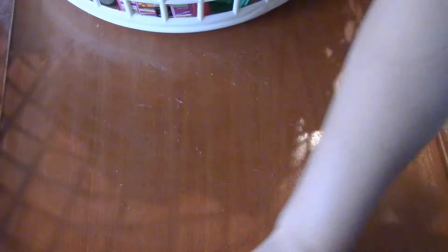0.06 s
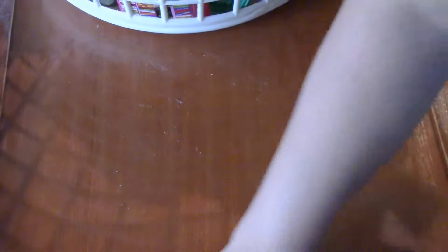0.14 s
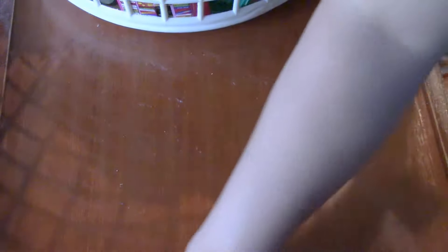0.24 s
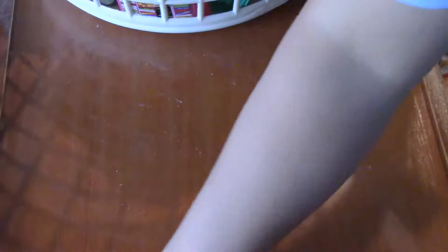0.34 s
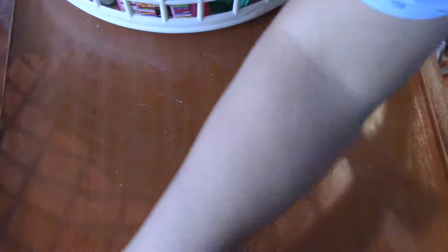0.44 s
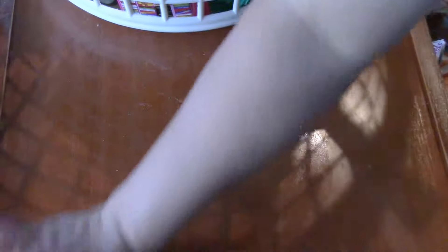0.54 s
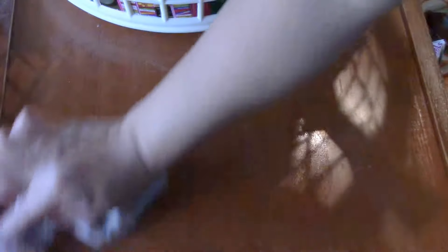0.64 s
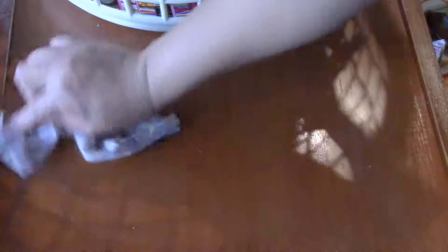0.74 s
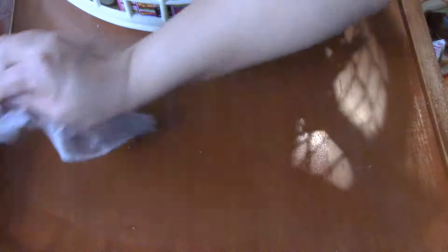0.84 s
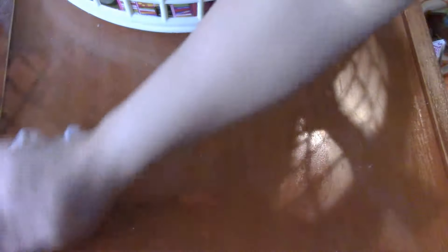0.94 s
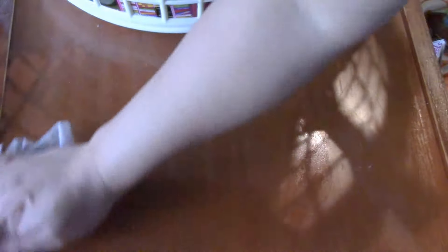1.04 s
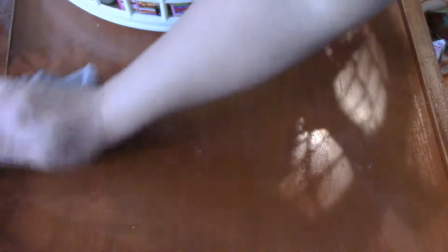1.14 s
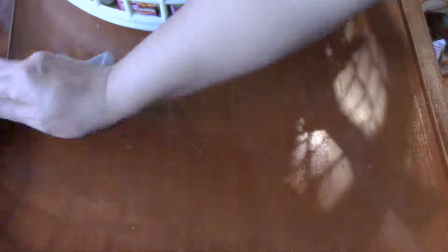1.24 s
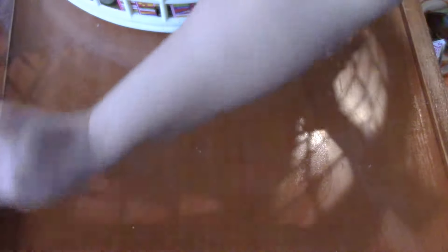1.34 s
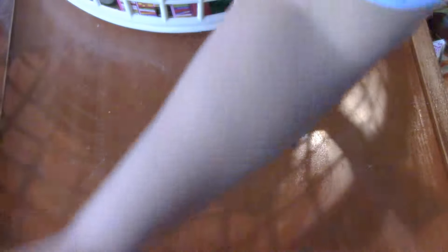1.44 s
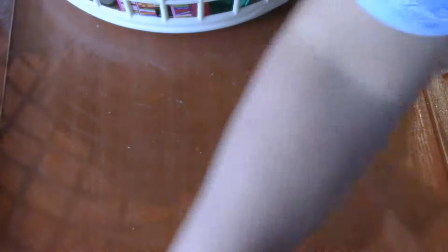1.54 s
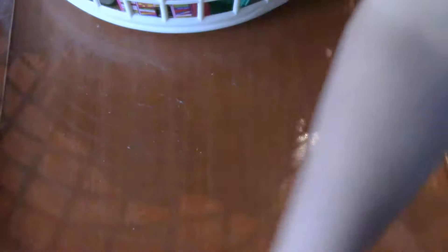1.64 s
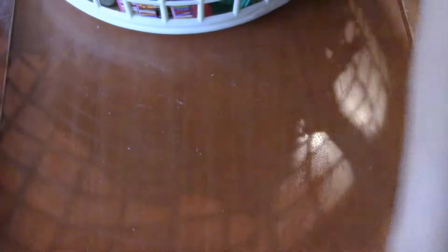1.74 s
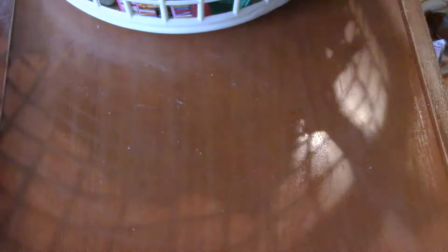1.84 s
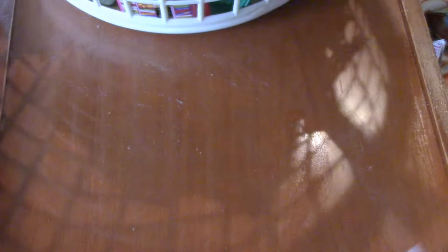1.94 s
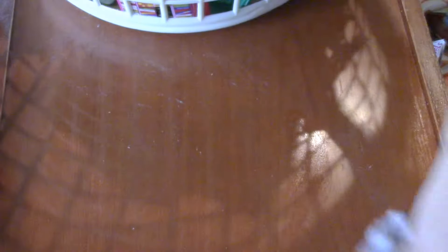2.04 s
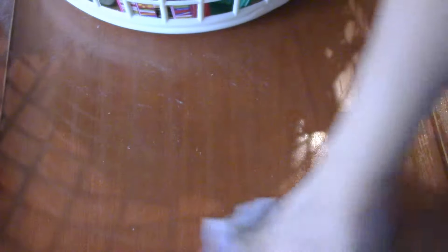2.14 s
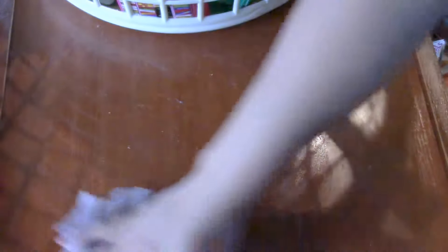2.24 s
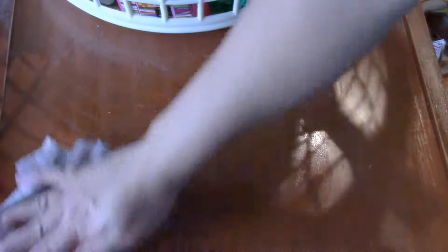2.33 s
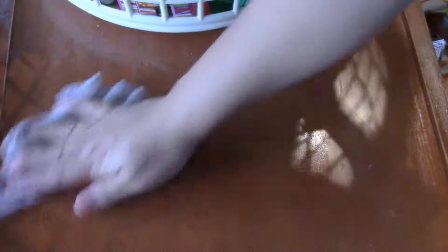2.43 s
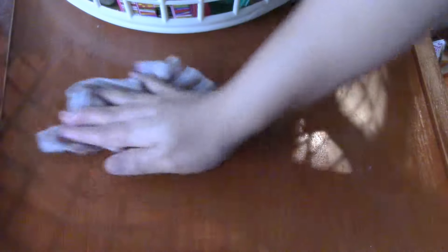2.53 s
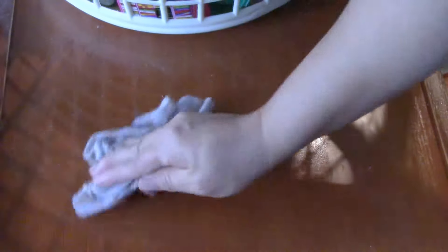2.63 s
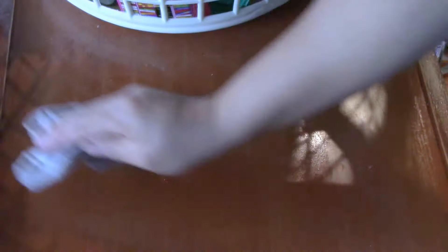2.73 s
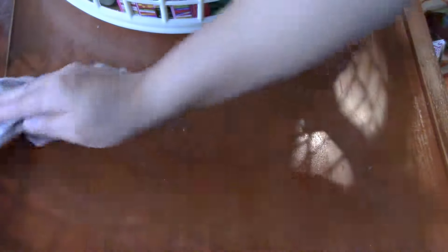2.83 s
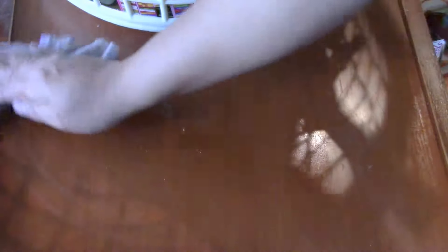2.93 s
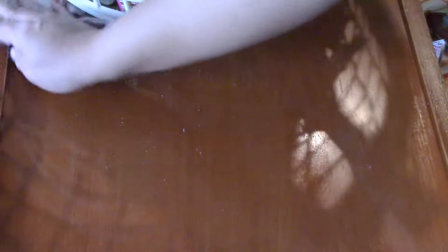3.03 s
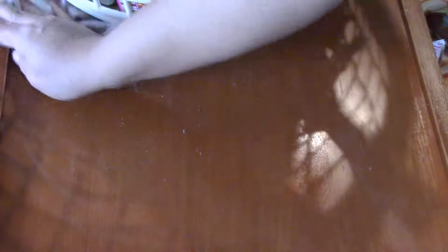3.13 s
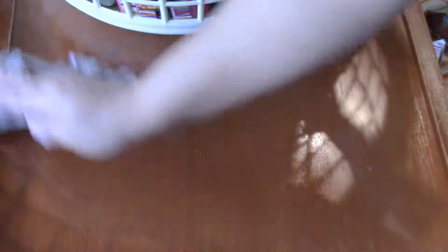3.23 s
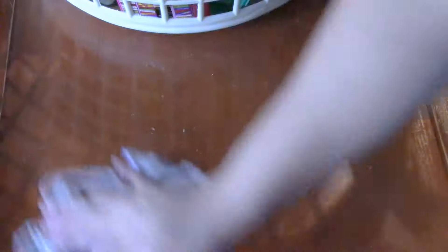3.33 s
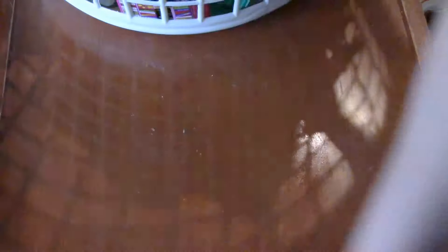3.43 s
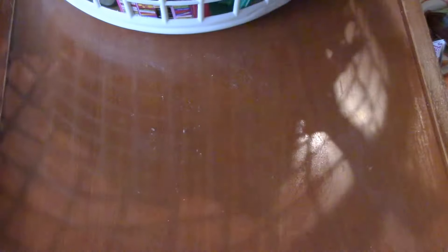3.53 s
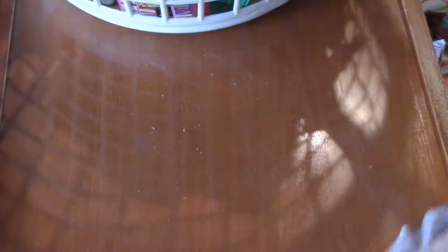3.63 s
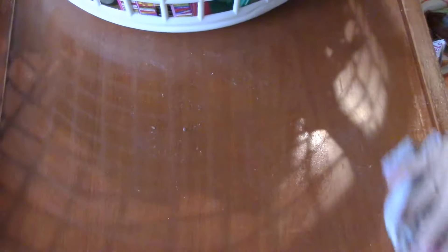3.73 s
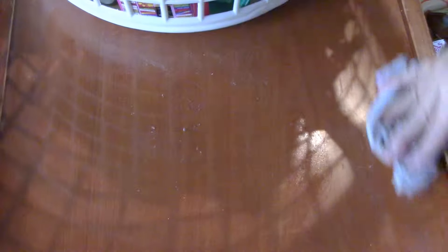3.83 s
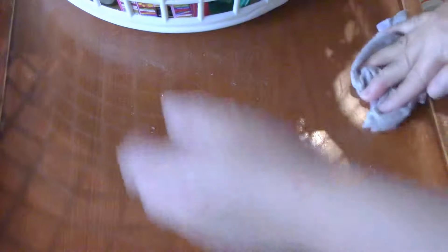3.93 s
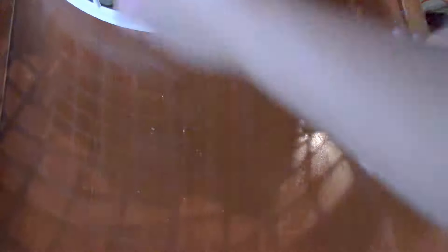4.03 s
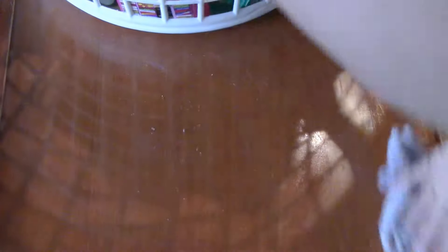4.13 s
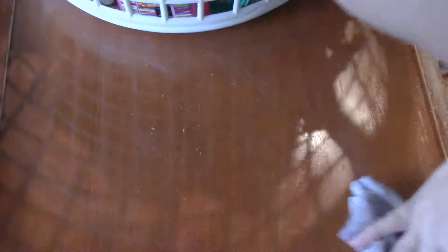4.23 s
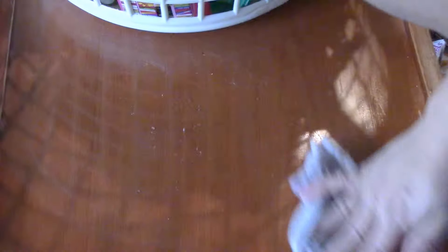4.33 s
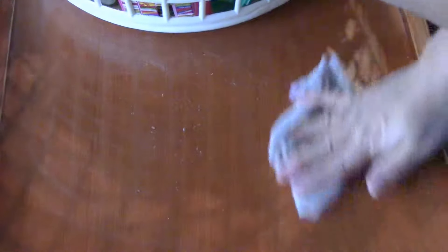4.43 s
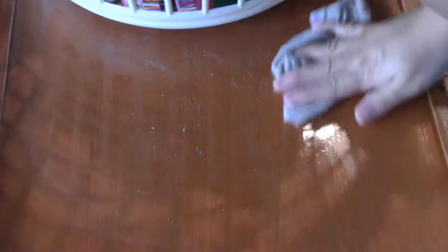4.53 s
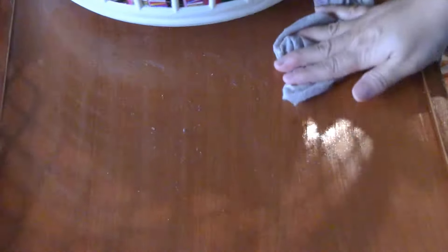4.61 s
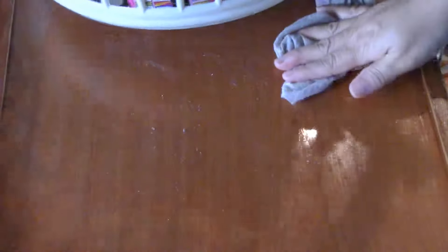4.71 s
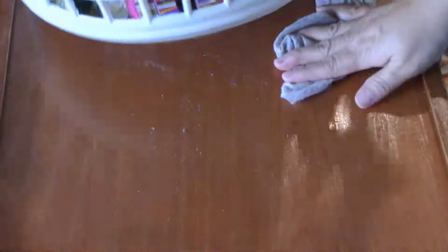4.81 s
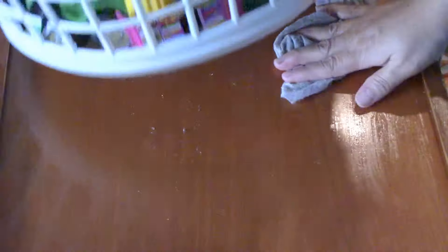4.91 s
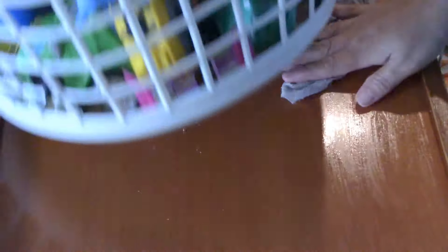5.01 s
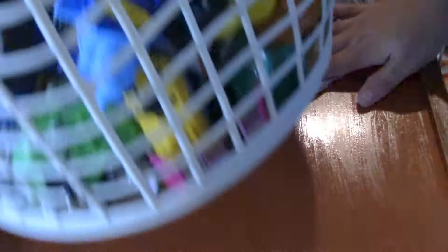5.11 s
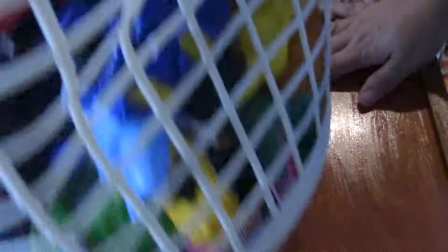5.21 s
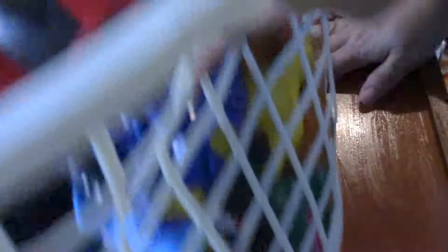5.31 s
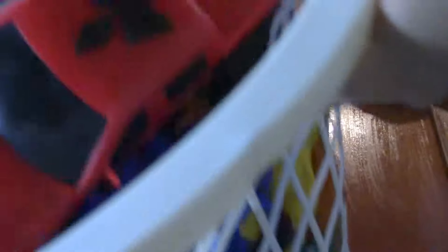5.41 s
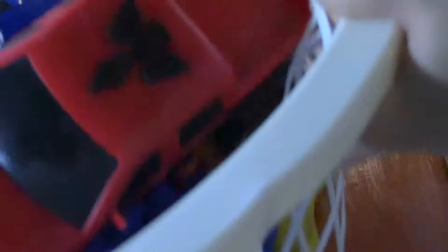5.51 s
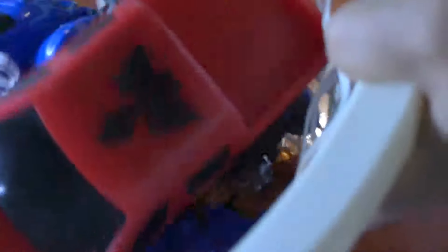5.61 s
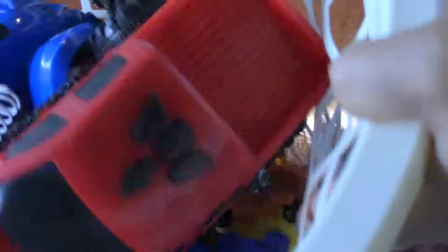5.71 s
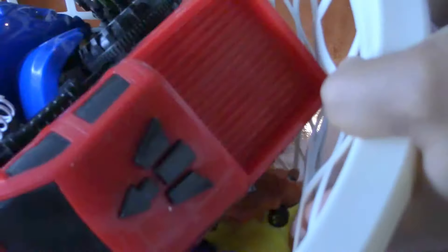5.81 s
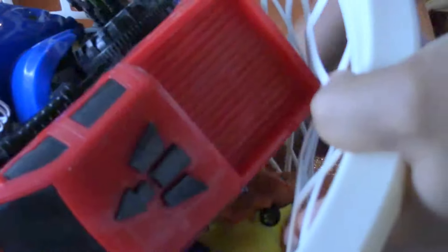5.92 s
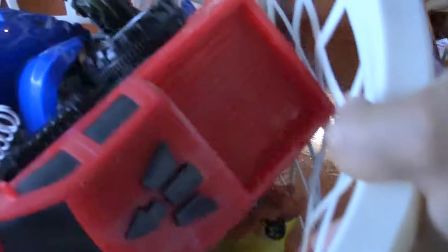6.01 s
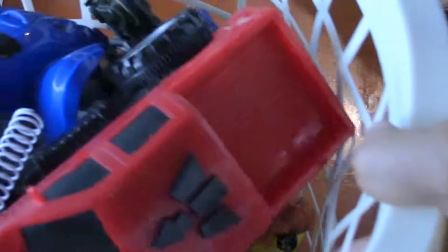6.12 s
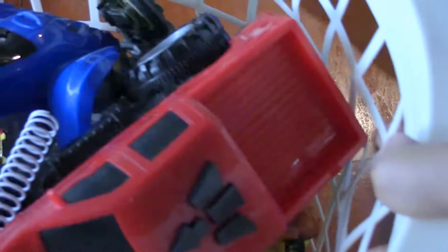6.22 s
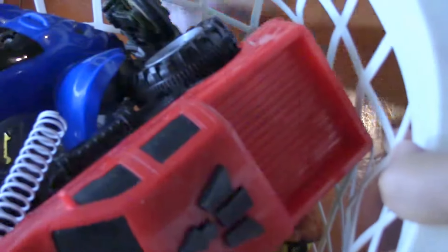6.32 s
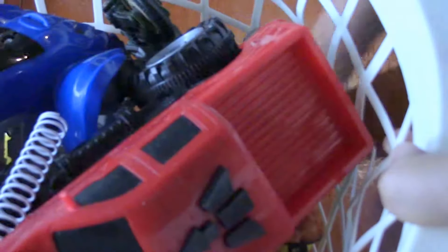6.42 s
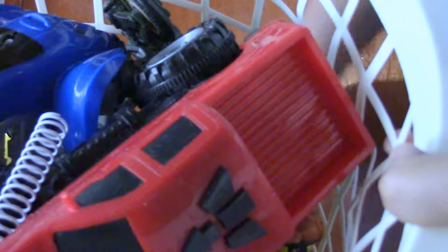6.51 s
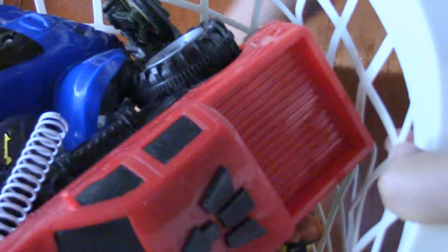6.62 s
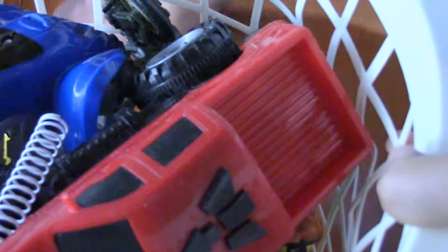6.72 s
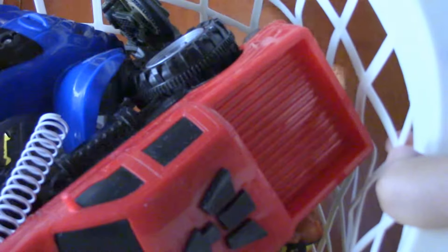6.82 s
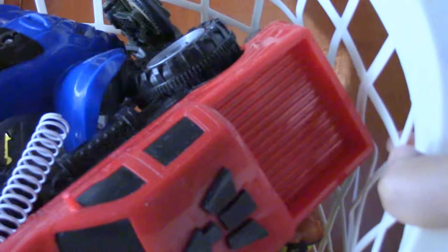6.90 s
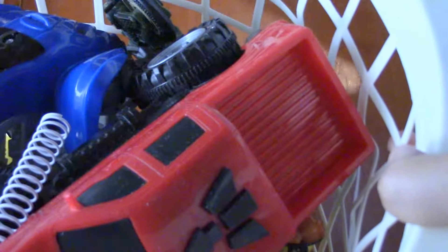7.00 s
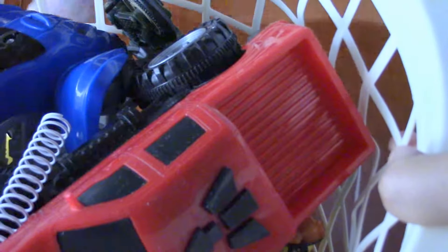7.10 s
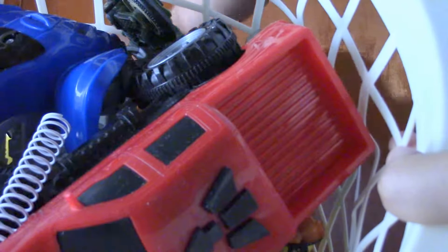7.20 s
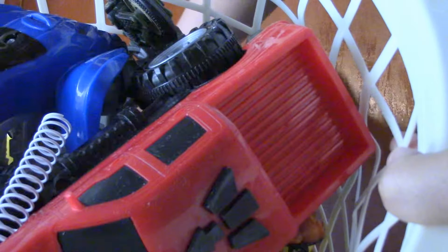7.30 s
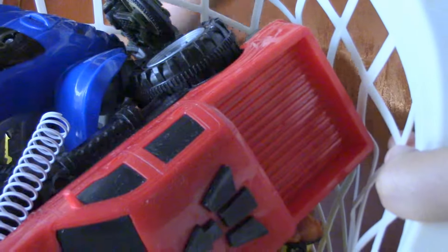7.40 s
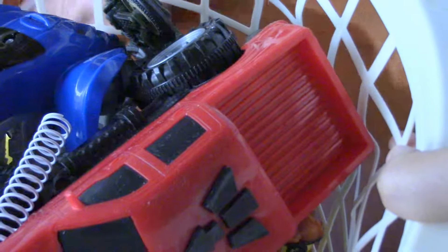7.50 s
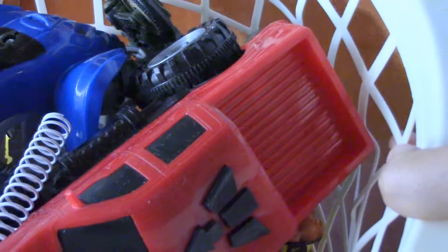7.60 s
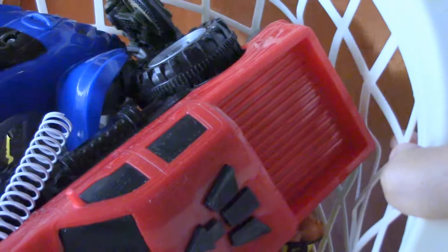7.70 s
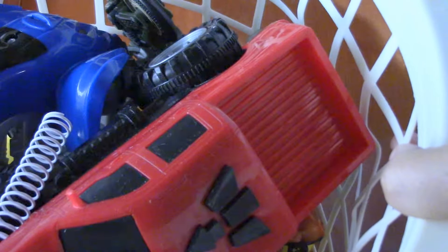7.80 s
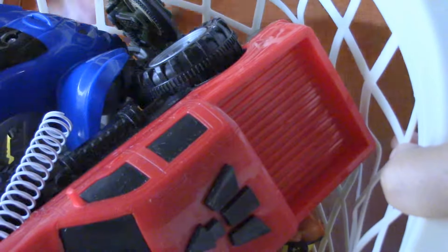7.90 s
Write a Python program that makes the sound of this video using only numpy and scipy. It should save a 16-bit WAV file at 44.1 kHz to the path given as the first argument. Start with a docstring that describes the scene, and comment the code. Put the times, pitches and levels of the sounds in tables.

```python
"""A cloth wipes a varnished wooden table in long strokes: noise from tiny slips, shaped by hand speed and pressure.
A plastic basket of toys on the table ticks as it rocks: short creaks ring the modes of the basket.
The basket is then lifted: hollow toys slide (jerky noise), clatter (bursts of modes) and settle; one snaps
against another (clicks into shell modes) while the wiping goes on.
The place is a small room, heard by a close stereo microphone over a steady floor of filtered noise."""
import sys
import numpy as np
from scipy import signal
from scipy.fft import rfft, irfft, next_fast_len
from scipy.io import wavfile

SR = 44100
rng = np.random.default_rng(int(sys.argv[2]) if len(sys.argv) > 2 else 0)


def unload_wav(signal):
    """Save mono or channel-first audio to the path in sys.argv[1] as 16-bit WAV at rate SR, clipped to [-1, 1]."""
    wavfile.write(
        sys.argv[1],
        SR,
        np.round(np.clip(np.atleast_2d(signal).T, -1, 1) * 32767).astype(np.int16),
    )


N = 350577
TIME = np.arange(N) / SR   # [s]

# Levels in the event tables are relative: each layer adds its own gain.
# strokes of the cloth: (start [s], end [s], hiss at full speed [dB], speeding up [s], slowing down [s])
STROKES = [(-0.05, 0.35, -55.5, 0.044, 0.18), (0.12, 0.49, -58.5, 0.12, 0.043),
           (0.49, 0.85, -53.5, 0.087, 0.11), (0.96, 1.08, -59.5, 0.047, 0.06),
           (1.06, 1.33, -52.5, 0.076, 0.15), (1.51, 2.05, -55.5, 0.19, 0.067),
           (2.02, 2.84, -53, 0.069, 0.42), (2.83, 3.13, -52, 0.24, 0.073), (3.13, 3.7, -57.5, 0.06, 0.086),
           (3.53, 4.03, -52, 0.17, 0.14), (4.01, 4.72, -53.5, 0.37, 0.14), (5.23, 5.55, -58.5, 0.05, 0.12),
           (5.58, 5.88, -60, 0.06, 0.15), (5.82, 6.25, -55.5, 0.1, 0.11), (6.42, 7.0, -55, 0.36, 0.13),
           (7.25, 7.36, -63, 0.03, 0.08), (7.33, 7.78, -57, 0.16, 0.07)]
# the hand bears down on the cloth, then eases off: (time [s], rub level [dB], easing [s])
PRESSES = [(0.0, -49, 0.18), (0.97, -51.5, 0.12), (1.16, -54, 0.11), (1.56, -55, 0.12), (2.06, -52, 0.07),
           (2.42, -54.5, 0.062), (2.87, -55, 0.36), (3.18, -58.5, 0.057), (3.64, -52.5, 0.2),
           (4.2, -52.5, 0.16), (4.5, -52, 0.39), (4.75, -44.5, 0.67), (6.04, -55, 0.089), (6.72, -53, 0.12)]
# colour of the hiss: (frequency [Hz], gain [dB])
HISS_COLOUR = [(1500, -41), (3000, -3.5), (5000, -3.5), (7500, -1), (9500, -3.5), (12000, -9), (14000, -14),
               (16000, -25)]
# colour of the rub: (frequency [Hz], gain [dB])
RUB_COLOUR = [(250, -25), (500, 1), (900, -0.5), (1500, -0.5), (2200, -0.5), (4000, -1.5), (6000, -6),
              (10000, -24)]
# resonances of the rubbed table top: (frequency [Hz], width [Hz], boost [dB])
WOOD_RESONANCES = [(510, 45, 6), (1870, 180, 2), (2340, 210, 4)]


def cloth(hiss_gain_db, rub_gain_db, flutter_db):
    """Thousands of fibres catch on the varnish; under pressure the wood sounds with them."""
    resting_hiss = from_db(-71.5)   # the cloth never quite stops
    resting_rub = from_db(-66.5)   # under the mere weight of the hand
    speed = np.sqrt(motions(STROKES) + resting_hiss ** 2)
    light_rub = from_db(-9) * speed   # a lightly held cloth rubs less than it hisses
    pressure = np.sqrt(pushes(PRESSES, attack_s=0.019) + light_rub ** 2 + resting_rub ** 2)
    hiss = speed * coloured(friction(per_s=25000, spread_db=-1.5), HISS_COLOUR)
    rub = pressure * coloured(friction(per_s=9000, spread_db=1.0), RUB_COLOUR)
    hiss = folding(from_db(hiss_gain_db) * hiss)
    rub = resonate(from_db(rub_gain_db) * rub, WOOD_RESONANCES)
    flutter = from_db(flutter_db * drift(40))
    return (hiss + rub) * flutter + scuffs(length_s=0.011, sharpness=2.8)


# the folds each favour one part of the hiss: (frequency [Hz], width [Hz])
FOLDS = [(3900, 1400), (6500, 2300), (9000, 3600)]


def folding(hiss):
    """The cloth's folds shift: each broad resonance comes and goes at its own pace."""
    swing_db, shifts_per_s = 1.5, 7
    for hz, width in FOLDS:
        lift = from_db(swing_db * drift(shifts_per_s)) - 1
        hiss = hiss + lift * signal.lfilter(*signal.iirpeak(hz, hz / width, fs=SR), hiss)
    return hiss


# the cloth catches and scuffs: (time [s], level [dB], pitch [Hz])
SCUFFS = [(0.04, -41, 1900), (0.172, -45, 2310), (3.047, -41, 2580), (3.803, -52, 7500),
          (4.484, -47.5, 3900), (7.102, -57, 8000)]


def scuffs(length_s, sharpness):
    """The cloth grabs the varnish for a moment and judders free."""
    out = 0
    for s, db, hz in SCUFFS:
        slips = coloured(friction(per_s=4000, spread_db=6.0), RUB_COLOUR)
        judder = rms_one(signal.lfilter(*signal.iirpeak(hz, sharpness, fs=SR), slips))
        out = out + from_db(db) * judder * np.exp(-((TIME - s) / length_s) ** 2)
    return out


# modes of the plastic basket: (frequency [Hz], level [dB], t60 [s])
BASKET_MODES = [(1010, -2.5, 0.035), (1162, 1, 0.067), (1296, -2.5, 0.031), (1445, 0, 0.049),
                (1636, 0, 0.044), (1955, 0.5, 0.022), (2180, -14, 0.023), (2230, -1.5, 0.015),
                (2560, -2.5, 0.019), (2890, -4, .025), (3340, -6.5, 0.022), (4140, -12.5, 0.019),
                (4670, -7, 0.022)]


def basket(level_db, creak_s, count=5):
    """Each rock is a short creak: a few slips within milliseconds into the basket's modes."""
    s, peak_db = ticks()
    place = (np.arange(count) + rng.random((len(s), count))) / count
    at = ((s[:, None] + creak_s * place) * SR).astype(int)
    swell = np.sin(np.pi * (np.arange(count) + 1) / (count + 1))
    out = 0
    for hz, mode_db, t60 in BASKET_MODES:
        heights = from_db(peak_db + mode_db + level_db)[:, None]
        clicks = np.zeros(N)
        clicks[at] = heights * swell * rng.standard_normal(at.shape)
        out = out + ring(clicks, hz, t60)
    return np.array([out, out])


# the wiping rocks the table: (first tick [s], last tick [s], level [dB])
ROCKING = [(0.298, 0.8702, -41), (1.9068, 2.8444, -41.5), (3.3104, 3.6752, -41.5), (7.4405, 7.698, -42)]
# harder jolts of the table, as the hand lands or turns: (time [s], level [dB])
JOLTS = [(0.0183, -37.5), (0.0448, -38), (0.166, -36), (0.2075, -34.5), (0.549, -36), (0.9812, -31.5),
         (1.0325, -35.5), (1.2479, -34), (1.427, -36.5), (1.573, -37), (3.0406, -42), (3.198, -40),
         (4.4256, -37.5), (4.4505, -38), (4.5237, -37.5), (7.334, -40.5), (7.3703, -39.5)]


def ticks():
    """The basket ticks at each swing of the rocking table and at each jolt: times and levels."""
    swing_s, spread_db = 0.085, 0.1   # the swing is rounded to fit whole swings into each span
    swings = []
    for first, last, db in ROCKING:
        count = int(round((last - first) / swing_s)) + 1
        for s in np.linspace(first, last, count):
            swings.append((s, db + spread_db * rng.standard_normal()))
    return np.transpose(swings + list(JOLTS))


# toys knocking together:
# (time [s], level [dB], strongest frequency [Hz], spread to half power of one bell [octaves], t60 at 2 kHz [s])
KNOCKS = [(4.7095, -33.5, 1400, 0.98, 0.08), (4.722, -32.5, 3140, 1.2, 0.12),
          (4.7406, -18.5, 3800, 0.98, 0.046), (4.751, -24.5, 6500, 1.54, 0.11),
          (4.7579, -21.5, 2580, 1.23, 0.048), (4.776, -25.5, 2700, 1.15, 0.059),
          (4.787, -31, 4800, 0.91, 0.076), (4.809, -32, 3000, 1, 0.05), (4.8589, -19, 3900, 1.07, 0.062),
          (4.869, -15.5, 5030, 1.18, 0.032), (4.9356, -24.5, 4800, 0.8, 0.031),
          (4.944, -24.5, 5500, 1.05, 0.062), (4.9601, -22.5, 2290, 1.45, 0.031),
          (4.967, -23.5, 1320, 1.44, 0.057), (4.972, -27, 9000, 2.1, 0.042),
          (5.0037, -31, 10000, 1.4, 0.027), (5.0256, -30, 1150, 1.45, 0.03), (5.036, -30, 1450, 1.2, 0.052),
          (5.1, -30, 1400, 1.5, 0.038), (5.141, -41.0, 2770, 2.1, 0.036), (5.154, -29.0, 1560, 1.2, 0.054),
          (5.194, -45, 1200, 3, 0.04), (5.2462, -26, 2650, 1.14, 0.06), (5.253, -29, 2880, 1.27, 0.079),
          (5.436, -24.5, 1350, 0.63, 0.047), (5.457, -26.5, 1500, 1.3, 0.053),
          (5.476, -31.5, 1500, 0.47, 0.07), (5.489, -22, 3400, 0.92, 0.016),
          (5.496, -26.5, 1140, 0.75, 0.06), (5.571, -36, 3000, 1.7, 0.044),
          (5.596, -30.5, 3270.0, 1.5, 0.077), (5.602, -28.5, 1800, 2.3, 0.04),
          (5.6107, -24.5, 11200, 1, 0.03), (5.632, -36, 1790, 1.35, 0.042),
          (5.666, -33.5, 10100, 1.4, 0.035), (5.698, -26, 970, 0.81, 0.057),
          (5.7212, -24, 905, 0.88, 0.055), (5.768, -43, 3500, 2.3, 0.03), (5.83, -39, 1450.0, 1.7, 0.1),
          (5.8689, -29.5, 2670, 2.8, 0.047), (5.878, -25.5, 3600, 0.76, 0.07),
          (5.894, -31.5, 1780.0, 1.9, 0.082), (5.94, -33, 1700, 2.9, 0.018), (5.957, -34, 840, 0.86, 0.051),
          (6.029, -40.5, 900, 2.6, 0.039), (6.139, -39, 1380, 1.18, 0.052), (6.29, -41, 970, 0.92, 0.039),
          (6.952, -41.5, 1000, 1.15, 0.12), (6.979, -38.5, 1200, 1.2, 0.054)]
# borders of the bands that share out the modes: [Hz]
KNOCK_EDGES = [190, 800, 2000, 4500, 16000]
# overall colour of a knock: (frequency [Hz], gain [dB])
TOY_COLOUR = [(190, -32), (450, -12), (700, 1.5), (1200, 4), (3000, -1.5), (5000, -2), (7000, -4.5),
              (10000, -11.5), (13000, -16), (16000, -35)]
# what the table top adds while the basket still stands on it: (frequency [Hz], gain [dB])
TABLE_COLOUR = [(250, 17), (420, 12.5), (640, 1.5), (900, -12)]
LIFT_S = 5.2   # the basket leaves the table


def knocks(level_db, treble_damping, contact_s, width, patchy_db, focus, count=100, size=7):
    """Every contact rings a different shell: many close, short modes, the high ones dying first."""
    out = np.zeros((2, N))
    t = np.arange(SR // 18) / SR
    attack = SR * 6 // 1000   # the first 6 ms set the level
    for s, db, centre_hz, octaves, t60 in KNOCKS:
        # a struck toy falls back once
        rebound_s, rebound_gain = s + 0.012 * (.5 + rng.random()), from_db(-15)
        for low, high in zip(KNOCK_EDGES, KNOCK_EDGES[1:]):
            place = (np.arange(count) + rng.random(count)) / count
            hz = low * (high / low) ** place
            life = t60 * (hz / 2000) ** -treble_damping
            decay = np.exp(-np.log(1000) * t / life[:, None])
            modes = np.sin(2 * np.pi * (hz[:, None] * t + rng.random((count, 1)))) * decay
            # the point of contact favours some groups of modes over others
            patches = np.interp(place, np.linspace(0, 1, size), rng.standard_normal(size))
            colour_db = at_hz(TOY_COLOUR, hz) + patchy_db * patches
            colour_db = colour_db + (s < LIFT_S) * at_hz(TABLE_COLOUR, hz)
            mid, side = rng.standard_normal((2, count))
            mode_gain = from_db(colour_db) * np.sqrt(hz) * bell(hz, centre_hz, octaves) ** focus
            strengths = stereo(mid, width * side, hz) * mode_gain
            knock = strengths @ modes * (1 - np.exp(-t / contact_s))
            knock = knock / np.sqrt(np.mean(knock[:, :attack] ** 2))
            band_gain = bell(np.sqrt(low * high), centre_hz, octaves)
            knock = knock * band_gain * from_db(db + level_db)
            for when, gain in (s, 1), (rebound_s, rebound_gain):
                start = int(when * SR)
                out[:, start:start + len(t)] += gain * knock
    return out


def bell(hz, centre_hz, octaves):
    """Gain that falls to half power so many octaves from its centre."""
    return np.sqrt(.5) ** ((np.log2(hz / centre_hz) / octaves) ** 2)


# the basket is tugged and tilted, and the toys slide:
# (start [s], end [s], level [dB], speeding up [s], slowing down [s])
SHOVES = [(4.44, 4.78, -44, 0.22, 0.054), (4.73, 5.17, -33.5, 0.032, 0.24),
          (5.22, 5.43, -36.5, 0.029, 0.18), (5.32, 5.6, -37, 0.07, 0.098), (5.56, 5.83, -34, 0.05, 0.17),
          (5.79, 6.01, -37.5, 0.055, 0.11)]
# colour of the sliding toys: (frequency [Hz], gain [dB])
SLIDE_COLOUR = [(88, -52), (150, -25), (264, -6), (334, -16), (805, -1.5), (1720, -0.5), (1870, -6),
                (2060, -3), (3100, -4), (5150, -9), (7180, -11.5), (12900, -31.5), (16000, -46)]
# the table top is bumped as the hand lands, or the basket's base shifts and drags on it: (time [s], level [dB],
# dying away [s])
DRAGS = [(0.29, -54.5, 0.06), (3.645, -53, 0.06), (4.958, -38.5, 0.08), (5.098, -39.5, 0.082),
         (5.24, -44, 0.051), (6.95, -44, 0.094)]
# colour of the dragging base: (frequency [Hz], gain [dB])
DRAG_COLOUR = [(120, -34), (250, -1.5), (400, 8), (600, 0.5), (950, -5), (1600, -0.5), (3000, -12.5),
               (6000, -71)]


def sliding(slide_gain_db, drag_gain_db, jerk_db):
    """Toys scrape along each other in jerks, and the base judders over the wood."""
    slide = np.sqrt(motions(SHOVES)) * coloured(friction(per_s=5000, spread_db=2.0), SLIDE_COLOUR)
    drag_force = np.sqrt(pushes(DRAGS, attack_s=0.0077))
    drag = drag_force * coloured(friction(per_s=1000, spread_db=0.5), DRAG_COLOUR)
    jerks = from_db(jerk_db * drift(90))
    return (from_db(slide_gain_db) * slide + from_db(drag_gain_db) * drag) * jerks


# one toy slips and snaps against the next, with a rebound: (time [s], level [dB])
SNAP_HITS = [(6.7576, -14.5), (6.7587, -6), (6.7611, -15.5)]
# colour of the toy's skid: (frequency [Hz], gain [dB])
SKID_COLOUR = [(400, -31), (1200, -11), (1750, -2), (2600, 0), (3300, -4), (3900, -11), (5200, -9.5),
               (12000, -34)]


def snap(level_db, crack_db, crack_s):
    """Hard contacts crack and ring the toy, which skids ever faster up to the blow, then comes to rest."""
    s, hit_db = np.transpose(SNAP_HITS)
    clicks = np.zeros(N)
    clicks[(s * SR).astype(int)] = from_db(hit_db + level_db)
    fading = signal.lfilter([1], [1, -np.exp(-1 / (crack_s * SR))], clicks + 1e-18)
    crack = from_db(crack_db) * fading * coloured(rng.standard_normal((2, N)), TOY_COLOUR)
    build_s, fade_s = 0.025, 0.1
    slip = np.exp(np.minimum((TIME - s[0]) / build_s, (s[0] - TIME) / fade_s))
    skid = from_db(-38.5) * slip * coloured(friction(per_s=12000, spread_db=2.5), SKID_COLOUR)
    return shell(clicks) + crack + skid


# modes of the snapping toy: (frequency [Hz], level [dB], t60 [s])
SNAP_MODES = [(930, -46, .025), (1230, -37, 0.03), (1560, -18, 0.023), (2110, -11.5, 0.022),
              (2353, -4, 0.02), (3210, -1.5, 0.0096), (3570, -8.5, 0.0075), (4840, -10, 0.0055),
              (5540, -14.5, .007), (6120, -20, 0.011), (9500, -21, 0.0045), (12300, -20, .004)]


def shell(force):
    """One stiff plastic shell, rung by whatever touches it; its modes alternate in sign."""
    out = 0
    for k, (hz, db, t60) in enumerate(SNAP_MODES):
        out = out + (-1) ** k * from_db(db) * ring(force, hz, t60)
    return out


def radiate(x, low_hz):
    """Small shells push little air at low frequencies."""
    return signal.sosfilt(signal.butter(4, low_hz, "high", fs=SR, output="sos"), x)


# ring of the small room: (frequency [Hz], t60 [s])
ROOM_T60 = [(200, 0.62), (1000, 0.66), (3000, 0.44), (8000, 0.34), (16000, 0.33)]


def room(x, build_s):
    """Diffuse reflections that build up and die away band by band."""
    t = np.arange(SR // 2) / SR
    edges, tail = np.geomspace(120, 16000, 9), 0
    for low, high in zip(edges, edges[1:]):
        hz = np.sqrt(low * high)
        band = signal.butter(2, [low, high], "band", fs=SR, output="sos")
        mid, side = signal.sosfilt(band, rng.standard_normal((2, len(t))))
        tail = tail + stereo(mid, side, hz) * np.exp(-np.log(1000) * t / at_hz(ROOM_T60, hz))
    tail = tail * (1 - np.exp(-t / build_s))
    return signal.fftconvolve(x, rms_one(tail) / np.sqrt(len(t)), axes=1)[:, :N]


# colour of the steady background: (frequency [Hz], gain [dB])
FLOOR_COLOUR = [(15, -61), (25, -20), (70, -28.5), (256, -4.5), (405, -4.5), (714, -1), (1040, -4.5),
                (1160, -6), (1520, -8.5), (3160, -18.5), (3820, -21), (5000, -27), (5730, -24), (7920, -37),
                (16000, -53)]
# hum of the room's air: (frequency [Hz], width [Hz], boost [dB])
ROOM_PEAKS = [(156, 47, 4), (258.4, 25, 5.5), (784, 120, 0)]


def background(level_db):
    """Steady coloured noise with the resonances of the room's air."""
    noise = coloured(rng.standard_normal((2, N)), FLOOR_COLOUR)
    return from_db(level_db) * rms_one(resonate(noise, ROOM_PEAKS))


def motions(rows):
    """Power of movements that each speed up, hold and slow down; amplitude follows speed."""
    power = 0
    for start, end, db, rise_s, fall_s in rows:
        ramps = np.clip((TIME - start) / rise_s, 0, 1) * np.clip((end - TIME) / fall_s, 0, 1)
        power = power + (from_db(db) * ramps) ** 2
    return power


def pushes(rows, attack_s):
    """Power of pushes that each set in quickly and die away."""
    power = 0
    for s, db, fade_s in rows:
        age = np.maximum(TIME - s, 0)
        envelope = np.minimum(age / attack_s, np.exp(-(age - attack_s) / fade_s))
        power = power + (from_db(db) * envelope) ** 2
    return power


def friction(per_s, spread_db):
    """Tiny slips at random moments and of uneven size, as a mid and side pair."""
    sizes = from_db(spread_db * np.minimum(rng.exponential(1, N), 4))
    return (rng.random(N) < per_s / SR) * sizes * rng.standard_normal((2, N))


def drift(rate):
    """Smooth chance of spread 1 that changes so many times a second."""
    steps = rng.standard_normal(4096)
    return rms_one(np.interp(TIME * rate, np.arange(len(steps)), steps))


def resonate(x, peaks):
    """Raise or lower each resonance in the sound with a peaking filter."""
    for hz, width, boost_db in peaks:
        x = x + (from_db(boost_db) - 1) * signal.lfilter(*signal.iirpeak(hz, hz / width, fs=SR), x)
    return x


def ring(clicks, hz, t60):
    """A unit click sets a decaying sine ringing from height 1."""
    r, w = from_db(-60 / (t60 * SR)), 2 * np.pi * hz / SR
    return signal.lfilter([0, np.sin(w)], [1, -2 * r * np.cos(w), r * r], clicks + 1e-18)


def coloured(excitation, spectrum):
    """Give a pair of excitations a broad colour and a stereo width; rms 1."""
    size = next_fast_len(N)
    hz = np.arange(size // 2 + 1) * SR / size
    mid, side = rfft(excitation, size) * from_db(at_hz(spectrum, hz))
    return rms_one(irfft(stereo(mid, side, hz), size)[:, :N])


# likeness of the left and right channels: (frequency [Hz], likeness [0-1])
LIKENESS = [(30, .2), (70, 0), (130, 1), (1000, 0.82), (2500, 0.67), (5000, 0.62), (9000, 0.48),
            (15000, 0.1)]


def stereo(mid, side, hz):
    """Left and right channels whose likeness depends on frequency: least in the deep bass near 70 Hz, low again
    in the high treble."""
    alike = np.clip(at_hz(LIKENESS, hz), 0, 1)
    mid, side = np.sqrt((1 + alike) / 2) * mid, np.sqrt((1 - alike) / 2) * side
    return np.array([mid + side, mid - side])


def at_hz(points, hz):
    """Read a table on a log-frequency axis."""
    f, value = np.transpose(points)
    return np.interp(np.log(np.maximum(hz, 1)), np.log(f), value)


def from_db(db):
    """Decibels to gain."""
    return 10 ** (np.asarray(db) / 20)


def rms_one(x):
    """Scale to unit power."""
    return x / np.sqrt(np.mean(x ** 2) + 1e-20)


# resonances of the heap of hollow toys: (frequency [Hz], width [Hz], boost [dB])
HEAP_RESONANCES = [(406, 41, -1), (738, 55, 3.5), (880, 67, 3.5), (1270, 180, 2), (3000, 660, 5),
                   (4080, 100, 1), (4700, 110, 3), (6100, 210, 4)]


def scene():
    """Cloth, basket and toys close by in the room, a little to the left, over the steady background."""
    wipe = cloth(hiss_gain_db=2.5, rub_gain_db=2.5, flutter_db=1.2)
    clatter = knocks(level_db=-2.0, treble_damping=0.15, contact_s=0.00049,
                     width=0.5, patchy_db=3.0, focus=0.5)
    toys = clatter + sliding(slide_gain_db=-4.0, drag_gain_db=1.5, jerk_db=3.0)
    heap = resonate(toys, HEAP_RESONANCES) + basket(level_db=-12.0, creak_s=0.007)
    top_toy = snap(level_db=0.0, crack_db=-17.5, crack_s=0.0025)
    # the toy on top is nearest, so the room answers it least
    echo = room(from_db(-12.5) * heap + from_db(-20.0) * top_toy, build_s=0.0018)
    near = radiate(wipe + heap + top_toy + echo, low_hz=197)
    left = np.array([[1], [-1]])   # raises the left channel and lowers the right
    return near * from_db(0.63 * left) + background(level_db=-52) * from_db(0.51 * left)


def record(dry):
    """The microphone's signal is cut steeply above 16 kHz."""
    return signal.sosfilt(signal.ellip(12, .1, 80, 16000, fs=SR, output="sos"), dry)


dry = scene()
out = record(dry)
unload_wav(out)
```